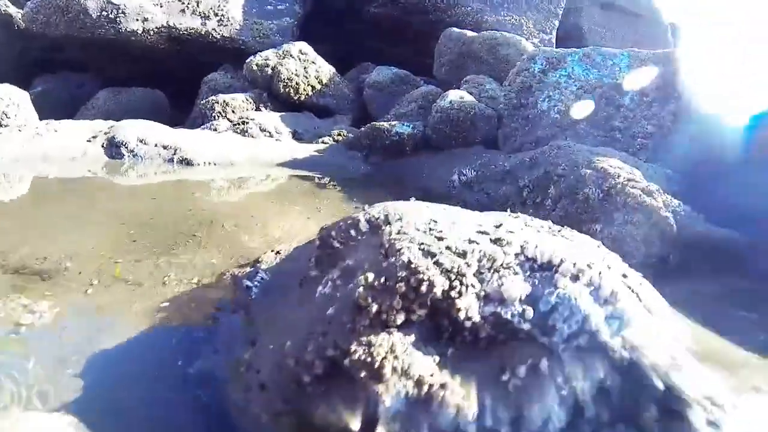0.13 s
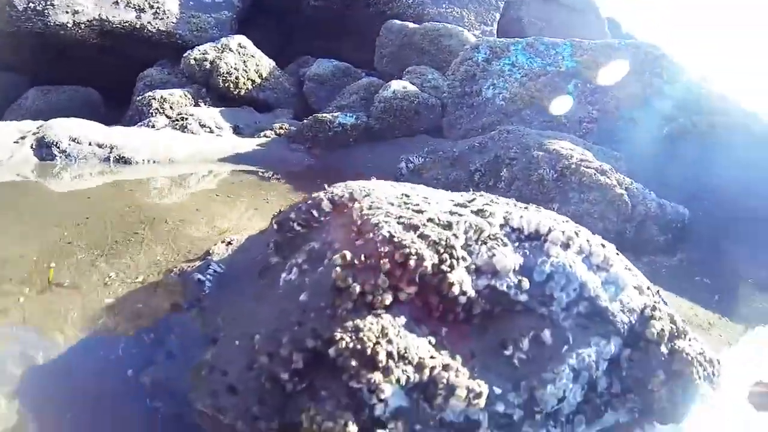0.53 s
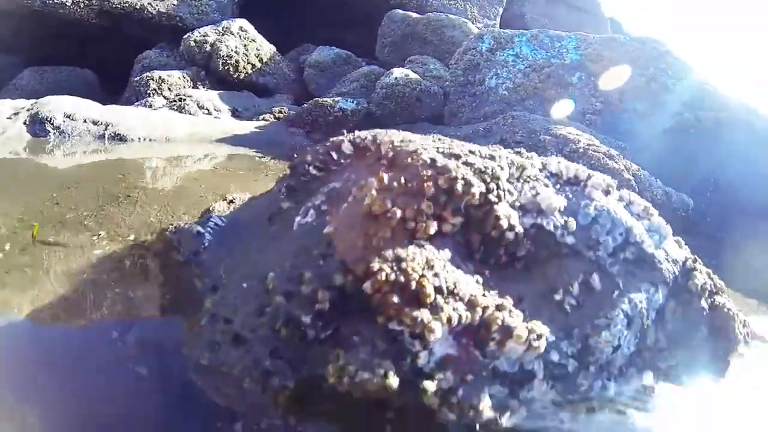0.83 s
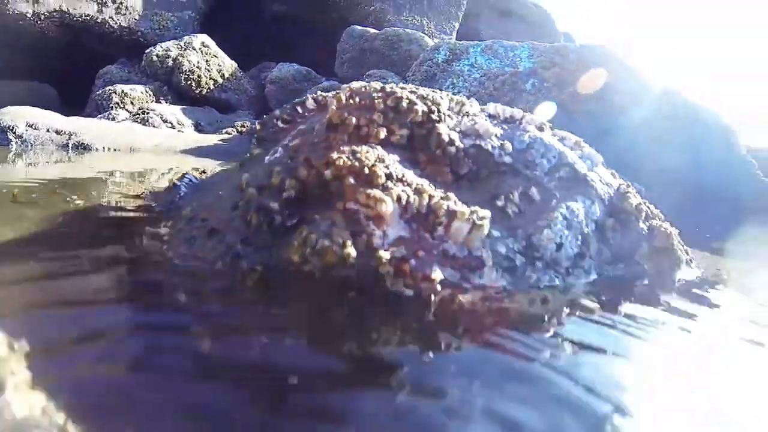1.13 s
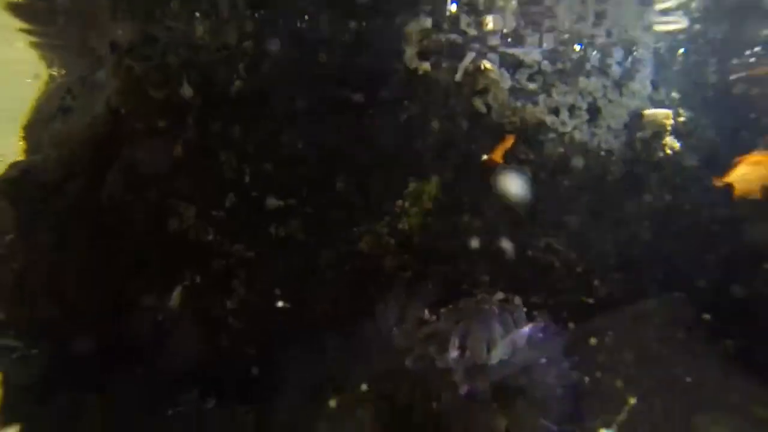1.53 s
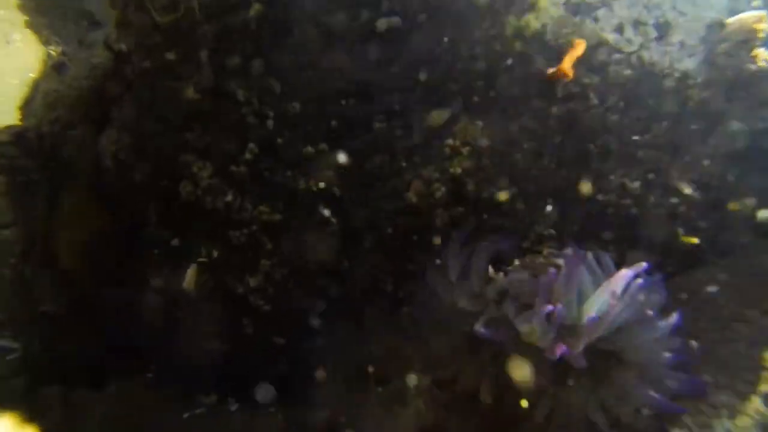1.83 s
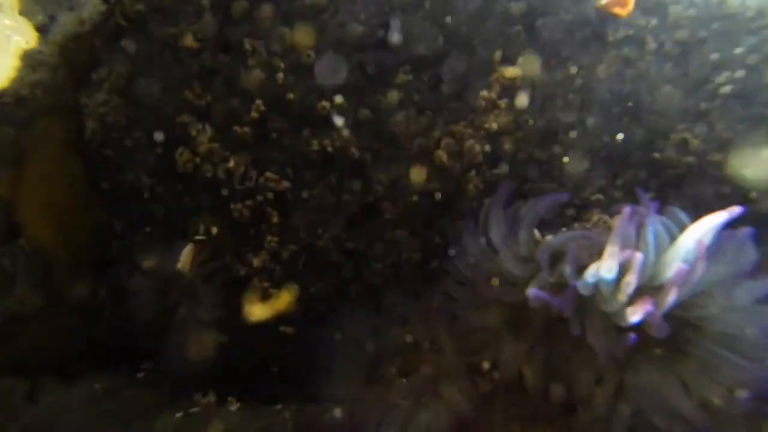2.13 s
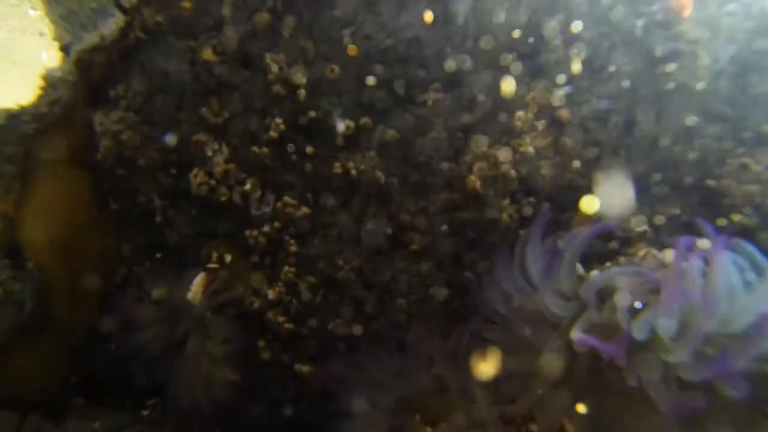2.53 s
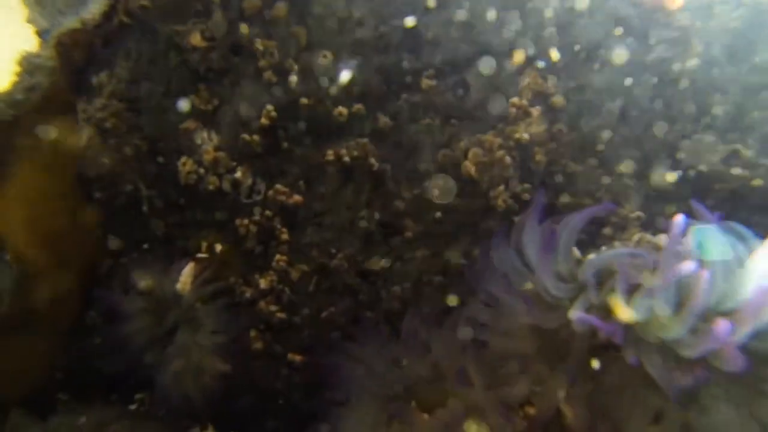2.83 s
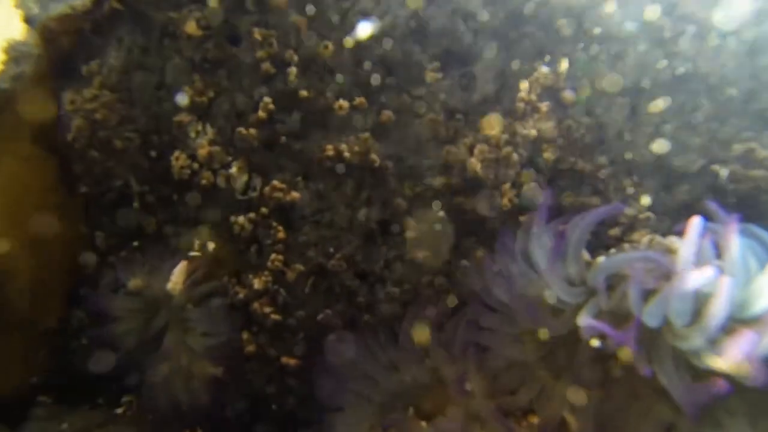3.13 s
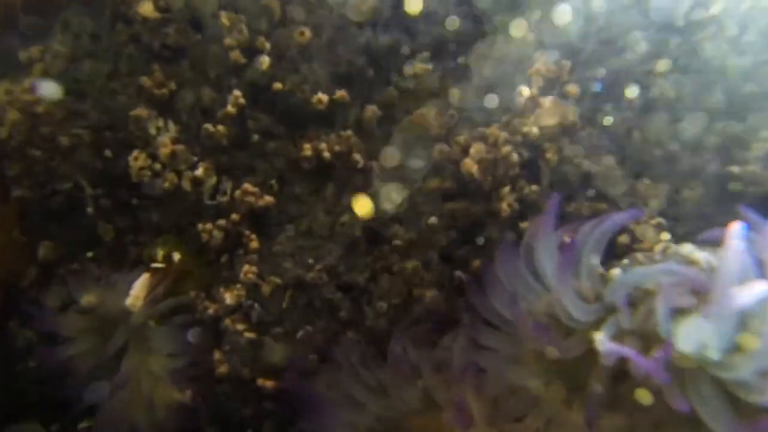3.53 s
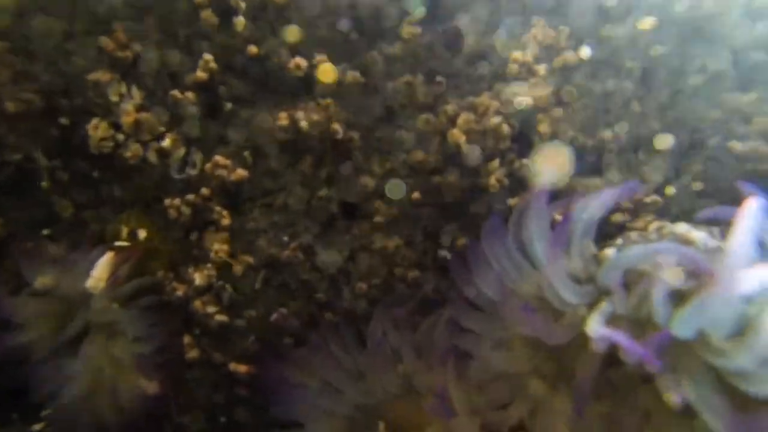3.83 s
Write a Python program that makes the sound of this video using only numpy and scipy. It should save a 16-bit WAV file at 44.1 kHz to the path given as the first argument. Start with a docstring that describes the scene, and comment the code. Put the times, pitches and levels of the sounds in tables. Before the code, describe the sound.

Water slaps and gurgles hard against a camera housing plunging into a rocky tide pool, after faint drips and low rumble; near-quiet underwater follows, then a loud dull knock and scrape close on the microphone.

```python
"""A camera is dipped into a rocky tide pool: water ticks, drips and tinkles over a low rumble, trickle and hiss.
Near 1.2 s water slaps the housing (resonant noise bursts) and closes over it in ringing bubbles (gliding sines).
Deeper glugs follow as trapped air escapes, then a faint plop, a tick and a grainy fizz. At 3.65 s the
submerged housing is knocked and scraped (resonant bursts, coloured grit, a low sine thud).
The camera's limiter ducks the background after loud peaks."""
import sys
import numpy as np
from scipy.fft import rfft, irfft
from scipy.io import wavfile
from scipy.ndimage import uniform_filter1d, minimum_filter1d, map_coordinates

SR = 44100
rng = np.random.default_rng(int(sys.argv[2]) if len(sys.argv) > 2 else 0)


def dump(signal):
    """Clip the signal to [-1, 1] and save it as 16-bit WAV at the path in sys.argv[1]."""
    limited = np.clip(np.atleast_2d(signal).T, -1, 1)
    pcm = np.round(limited * 32767).astype(np.int16)
    wavfile.write(sys.argv[1], SR, pcm)


N = 176400
TOP_HZ = 15950  # band limit; also the highest spray pitch
TINY_GLIDE_OCTAVES = 0.035  # pitch rise of tiny bubbles over their t60

# Water slapping the housing. Each row: start in seconds, level in dB, t60 in seconds, treble tilt in dB per octave.
SLAPS = [(1.197, -25.5, 0.028, -3.5), (1.2107, -9, 0.013, 5), (1.2222, -18.5, 0.036, -1),
         (1.2546, -26.5, .02, -3), (1.2788, -26.5, .025, -1.5), (1.2925, -8, 0.02, 1.5),
         (1.314, -17.5, .024, -1.5), (1.3227, -17, 0.049, 0), (1.336, -8.5, .028, 1.5),
         (1.346, -18, 0.061, -0.5), (1.367, -23, 0.006, 6.5), (1.378, -25.5, 0.028, -2.5),
         (1.4003, -14.5, 0.0086, 3), (1.407, -27, 0.02, -0.5), (1.4252, -31.5, 0.017, -0.5),
         (1.468, -39, 0.03, -1.5), (1.541, -29.5, .0077, -1), (1.5815, -13.5, 0.0046, 8),
         (1.5874, -20.5, 0.046, -4.5), (1.6516, -25.5, 0.032, -1), (1.6702, -20.5, 0.016, 5),
         (1.688, -26.5, 0.05, -4.5), (1.705, -10.5, 0.017, -4.5), (1.716, -16, 0.011, 5.5),
         (1.7828, -17, 0.017, -3.5), (2.139, -41, 0.0091, 1)]


def amp(db):
    """Decibels to gain."""
    return 10 ** (np.asarray(db) / 20)


def unit(x):
    """Scale to rms 1."""
    return x / np.sqrt(np.mean(x ** 2) + 1e-20)


def level(rows):
    """Gain per sample from (s, dB) points, silent outside them."""
    s, db = np.transpose(rows)
    return amp(np.interp(np.arange(N) / SR, s, db, left=-np.inf, right=-np.inf))


def wobble(knots_per_s, size=N):
    """Smooth random curve through normally distributed knots."""
    knots = rng.standard_normal(size // 20)
    return map_coordinates(knots, [np.arange(size) * knots_per_s / SR], mode="wrap")


def octaves(size):
    """Position of each FFT bin on a log2 frequency axis."""
    return np.log2(np.fft.rfftfreq(size, 1 / SR) + 1)


def response(size, colour, tilt_db):
    """Gain per FFT bin from (Hz, dB) points plus a tilt per octave."""
    hz, db = np.transpose(colour)
    octave = octaves(size)
    return amp(np.interp(octave, np.log2(hz + 1), db) + tilt_db * octave)


def coloured(x, colour, tilt_db=0):
    """Filter x to the given spectrum, at rms 1."""
    return unit(irfft(rfft(x) * response(len(x), colour, tilt_db), len(x)))


def burst(colour, t60, crack, tilt_db=0, size=8192):
    """A sharp pulse and a clumpy, dying spatter excite the same minimum-phase resonances."""
    clump_db, clumps_per_s, attack_s = 2.5, 760, .0005
    t = np.arange(size) / SR
    spatter = rng.standard_normal(size) * amp(clump_db * wobble(clumps_per_s, size))
    envelope = amp(-60 * t / t60) * (1 - np.exp(-t / attack_s))
    pulse = unit(1.0 * (t == 0))
    drive = unit(spatter * envelope) + crack * pulse
    # folding the cepstrum onto positive time gives minimum phase: ringing follows the impact
    cepstrum = irfft(np.log(response(size, colour, tilt_db)))
    causal = (t > 0) * (np.arange(size) < size // 2)
    body = np.exp(rfft(2 * cepstrum * causal))
    return unit(irfft(rfft(drive) * body)) * np.sqrt(np.mean(envelope ** 2))


def ring(hz, t60, glide_octaves, size=5512):
    """One air pocket: swells within a few cycles, then rings down while its pitch bends and warbles."""
    onset_cycles, warble_octaves, warbles_per_s = 0.9, .025, 350
    t = np.arange(size) / SR
    swell = 1 - np.exp(-(t * hz / onset_cycles) ** 2)
    shape = swell * amp(-60 * t / t60)
    bend = glide_octaves * np.minimum(t / t60, 1)
    pitch_hz = hz * 2 ** (bend + warble_octaves * wobble(warbles_per_s, size))
    return shape / shape.max() * np.sin(2 * np.pi * np.cumsum(pitch_hz) / SR)


def add(track, s, sound):
    """Mix a sound in at time s."""
    part = track[round(s * SR):][:len(sound)]
    part += sound[:len(part)]


def electronics():
    """Camera hiss and a faint whine, both fluttering in level at one steady rate."""
    # Each row: frequency in Hz, relative level in dB.
    hiss_colour = [(88, -25.5), (150, -2), (328, -10), (524, -10), (578, -12.5), (2020, -28), (7180, -32.5),
                   (11000, -38), (16000, -47.5)]
    hiss_db, hiss_flutter_db = -62.5, 3.2
    whine_hz, whine_db, whine_flutter_db = 11260, -85, 7.9
    flutter_hz = 29.9
    t = np.arange(N) / SR
    flutter = np.sin(2 * np.pi * flutter_hz * t)
    hiss = coloured(rng.standard_normal(N), hiss_colour) * amp(hiss_db + hiss_flutter_db * flutter)
    phase = 2 * np.pi * whine_hz * t + .9 * wobble(120)
    return hiss + amp(whine_db + whine_flutter_db * flutter) * np.sin(phase)


def rumble():
    """Low rumble on the moving housing: deep coloured noise with a drifting level."""
    # Each row: time in seconds, level in dB.
    rumble_level = [(0, -29.5), (.6, -32), (.87, -24.5), (1.15, -32), (1.6, -37.5), (2.15, -31.5),
                    (3.35, -35), (3.6, -30.5), (4, -34.5)]
    # Each row: frequency in Hz, relative level in dB.
    rumble_colour = [(8, -4), (18, 7.5), (40, -1.5), (60, -13), (85, -19.5), (130, -31), (250, -49.5),
                     (600, -74)]
    return coloured(rng.standard_normal(N), rumble_colour) * level(rumble_level)


def trickle():
    """Fine trickle: clumpy specks of noise, coloured."""
    # Each row: time in seconds, level in dB.
    trickle_level = [(0, -66.5), (.2, -61.5), (.5, -67), (1.5, -65.5), (2.2, -72.5), (4, -71.5)]
    # Each row: frequency in Hz, relative level in dB.
    trickle_colour = [(500, -20), (1000, -8.5), (1500, 0), (2100, -6.5), (3300, -7), (5000, -16),
                      (7000, -20), (16000, -32.5)]
    specks = rng.standard_normal(N) * amp(3.1 * wobble(700))
    return coloured(specks, trickle_colour) * level(trickle_level)


def fizz():
    """Grainy swells of noise: a broad high puff, then a narrow mid-pitched fizz."""
    # Each row: centre in seconds, peak level in dB, half length in seconds, centre in Hz, half width in octaves.
    swells = [(1.01, -62.5, 0.017, 9610, 1), (2.556, -60, .05, 1580, 0.21)]
    out, t = np.zeros(N), np.arange(N) / SR
    octave = octaves(N)
    for s, db, half_s, hz, width in swells:
        band = 1 / (1 + ((octave - np.log2(hz)) / width) ** 2)
        grains = rng.standard_normal(N) * amp(2 * wobble(220))
        swell = np.exp(-((t - s) / half_s) ** 2)
        out += amp(db) * unit(irfft(rfft(grains) * band, N)) * swell
    return out


def drips():
    """Small drips and laps nearby: short resonant bursts led by a strong pulse."""
    # Each row: start in seconds, level in dB, t60 in seconds, treble tilt in dB per octave.
    drip_rows = [(0.032, -28.5, 0.009, 3), (.193, -28, 0.013, 1.5), (0.2057, -28, 0.011, -4),
                 (0.2284, -35, 0.017, 3.5), (0.3662, -39.5, 0.0059, 5), (0.4684, -45.5, 0.017, 6.5),
                 (.616, -46, 0.016, 10), (.942, -40.5, 0.011, -3.5), (1.044, -39.5, 0.012, -4.5),
                 (2.548, -40.5, 0.013, -1)]
    # Each row: frequency in Hz, relative level in dB.
    drip_colour = [(200, -8.5), (750, -23), (1300, 11), (1550, 4), (2000, -4), (3400, -6.5), (4200, -15.5),
                   (5000, -16.5), (8000, -28.5), (16000, -40)]
    out = np.zeros(N)
    for s, db, t60, tilt_db in drip_rows:
        add(out, s, amp(db) * burst(drip_colour, t60, crack=.8, tilt_db=tilt_db))
    return out


def scrape():
    """Short gritty scrape: clumpy noise through the housing's resonances."""
    # Each row: time in seconds, level in dB.
    scrape_level = [(3.668, -40), (3.68, -19.5), (3.705, -25.5), (3.733, -27), (3.745, -43), (3.77, -65)]
    # Each row: frequency in Hz, relative level in dB.
    scrape_colour = [(40, -0.5), (220, -13), (620, -24), (880, -10.5), (1400, -23), (1660, -11),
                     (1950, -30), (2800, -26), (3700, -38), (16000, -58.5)]
    grit = rng.standard_normal(N) * amp(5 * wobble(700))
    return coloured(grit, scrape_colour) * level(scrape_level)


def knocks():
    """Dull knocks ring the submerged housing; the third sets off a low, decaying push of water."""
    # Each row: start in seconds, level in dB, t60 in seconds.
    knock_rows = [(3.652, -12.5, 0.043), (3.6569, -5, 0.015), (3.6585, -8.5, 0.031), (3.662, -17, 0.011),
                  (3.681, -21, .014), (3.6962, -12, 0.015), (3.705, -15.5, 0.015), (3.7109, -13, 0.013),
                  (3.724, -19, 0.011), (3.729, -24.5, 0.02), (3.7582, -35, 0.019)]
    # Housing resonances. Each row: frequency in Hz, relative level in dB.
    housing = [(40, -24), (90, 0), (330, -6.5), (560, 1.5), (900, -9), (1500, -8), (1900, -20.5),
               (3000, -13.5), (3800, -30), (5400, -29.5), (7400, -40.5), (16000, -48)]
    thud_hz, thud_db, thud_t60_s = 42.1, -8, 0.21
    out = np.zeros(N)
    for s, db, t60 in knock_rows:
        add(out, s, amp(db) * burst(housing, t60, crack=0.81))
    t = np.arange(SR // 3) / SR
    thud = amp(thud_db - 60 * t / thud_t60_s) * np.sin(2 * np.pi * thud_hz * t)
    add(out, knock_rows[2][0], thud)
    return out


def slaps():
    """Water slapping the housing: a pulse and dying spatter through fixed resonances."""
    # Each row: frequency in Hz, relative level in dB.
    slap_colour = [(60, -7.5), (400, 2.5), (700, -0.5), (1150, 1.5), (1700, 7), (2500, 1.5), (3600, -4.5),
                   (4700, -13.5), (5900, -9.5), (7500, -20), (9700, -16.5), (12000, -24), (16000, -25.5)]
    out = np.zeros(N)
    for s, db, t60, tilt_db in SLAPS:
        add(out, s, amp(db) * burst(slap_colour, t60, crack=.4, tilt_db=tilt_db))
    return out


def spray(count=6):
    """Every slap pushes on the housing with a pressure pulse and sheds a few tiny bubbles."""
    push_db, push_peak_s = -12.5, 0.0011  # dB relative to the slap
    centre_hz, spread_octaves, t60_cycles = 2910, .6, 56.5
    spray_db, lag_unit_s, fade_db_per_lag = -25, 0.0069, 4.44  # dB relative to the slap
    u = np.arange(SR // 30) / SR / push_peak_s
    push = u * np.exp(1 - u)
    out = np.zeros(N)
    for s, db, _, _ in SLAPS:
        add(out, s, amp(db + push_db) * push)
        for pitch, lag in zip(rng.standard_normal(count), rng.uniform(0, 2, count)):
            hz = min(centre_hz * 2 ** (spread_octaves * pitch), TOP_HZ)
            gain = amp(db + spray_db - fade_db_per_lag * lag)
            add(out, s + lag * lag_unit_s, gain * ring(hz, t60_cycles / hz, TINY_GLIDE_OCTAVES))
    return out


def tinkles():
    """Tiny beads of water: short, high, slightly rising rings."""
    # Each row: start in seconds, peak level in dB.
    beads = [(.085, -47), (0.118, -51), (0.1513, -50), (.166, -47), (.1731, -47), (.2234, -41.5),
             (.3666, -49)]
    bead_hz, bead_t60_s = 4800, 0.011
    out = np.zeros(N)
    for s, db in beads:
        add(out, s, amp(db) * ring(bead_hz, bead_t60_s, TINY_GLIDE_OCTAVES))
    return out


def bubbles():
    """Plops and glugs of larger air pockets, each a decaying, gliding sine."""
    # Each row: start in seconds, pitch in Hz, peak level in dB, t60 in seconds, glide in octaves.
    pockets = [(.131, 1930, -43.5, 0.04, 0.061), (.645, 1490, -39, 0.074, -0.2),
               (1.2103, 1978, 9.5, 0.011, -0.16), (1.212, 1860, -3.5, 0.026, -0.12),
               (1.2217, 2180, -13, 0.028, -0.095), (1.228, 3300, -19, 0.013, 0),
               (1.2932, 1674, 4, .022, 0.11), (1.2925, 1164, -4, 0.023, .03),
               (1.3052, 2480, -24, 0.015, 0.0097), (1.3208, 1417, -6, 0.04, -0.29),
               (1.3232, 884, -5, .026, -.15), (1.3382, 1230, 2.5, 0.021, 0.23), (1.34, 1641, 5, .034, .12),
               (1.3492, 1947, -6, 0.036, .03), (1.336, 5620, -15, .04, .08),
               (1.336, 3390, -16.5, .012, .03), (1.338, 694, -10.5, 0.014, .04),
               (1.3787, 3090, -18, 0.015, .08), (1.402, 2010, -11.5, .022, 0.028),
               (1.4011, 1566, -14.5, 0.026, 0.028), (1.402, 3270, -20, 0.021, .03),
               (1.5857, 570, -18.5, 0.04, -0.021), (1.588, 864, -18.5, 0.049, -0.15),
               (1.594, 1400, -19, 0.022, 0.13), (1.652, 1587, -12, 0.019, 0.067),
               (1.669, 3260, -19, 0.013, 0.094), (1.669, 2180, -22, 0.021, 0.0033),
               (1.7042, 488, -11, 0.035, .04), (1.7055, 814, -16, 0.029, -0.031),
               (1.722, 498, -32.5, .08, -.04), (1.7166, 1550, -17, 0.013, .1),
               (1.785, 1400, -16.5, 0.0083, -.25), (1.785, 510, -10.5, 0.042, -0.082),
               (1.785, 930, -23, .05, 0.087), (2.139, 512, -40.5, .03, 0)]
    out = np.zeros(N)
    for s, hz, db, t60, glide_octaves in pockets:
        add(out, s, amp(db) * ring(hz, t60, glide_octaves))
    return out


def scene():
    """Everything at the one microphone."""
    background = electronics() + rumble() + trickle() + fizz() + drips()
    bump = scrape() + knocks()
    plunge = slaps() + spray() + tinkles() + bubbles()
    return (background + bump + plunge)[None]


def limiter(x):
    """Turns down at once on a peak, holds, then recovers at a steady rate."""
    ceiling_db, hold_s, release_db_per_s = 1.5, 0.46, 15
    gain_db = np.minimum(0, ceiling_db - 20 * np.log10(np.abs(x) + 1e-9))
    half = int(hold_s * SR / 2)
    # the shifted window looks back only
    held = minimum_filter1d(gain_db, 2 * half + 1, origin=half, mode="nearest")
    recovery = release_db_per_s * np.arange(N) / SR
    gain_db = np.minimum.accumulate(held - recovery) + recovery
    # widen by a few ms, then round the corners
    widened = minimum_filter1d(gain_db, size=200)
    return x * amp(uniform_filter1d(widened, size=100))


def record(dry):
    """Limiter, soft overload and a steep band limit."""
    x = limiter(dry[0])
    x = x / (1 + np.abs(x / 1.1) ** 4) ** (1 / 4)
    low_pass = 1 / np.sqrt(1 + (np.fft.rfftfreq(N, 1 / SR) / TOP_HZ) ** 160)
    return irfft(rfft(x) * low_pass, N)[None]


dry = scene()
out = record(dry)
dump(out)
```